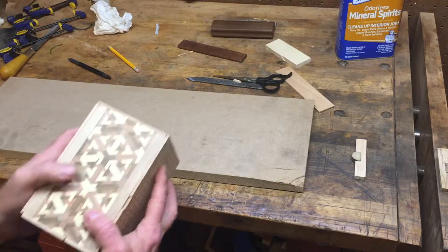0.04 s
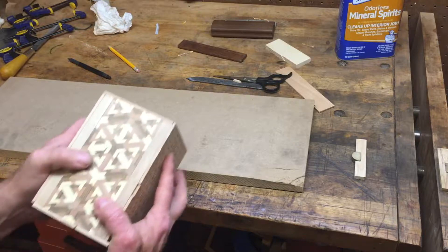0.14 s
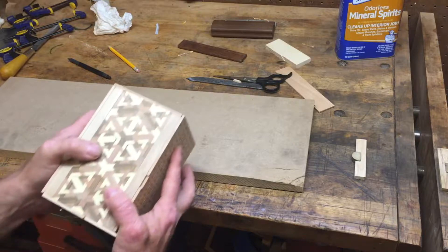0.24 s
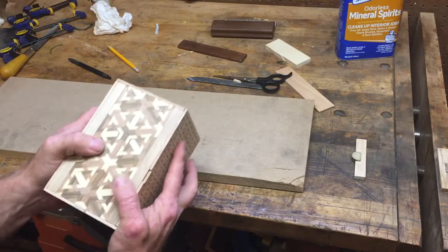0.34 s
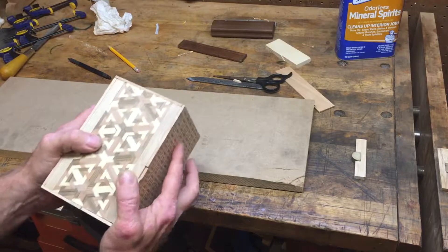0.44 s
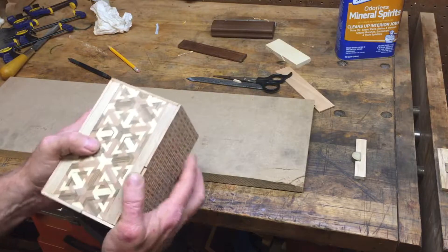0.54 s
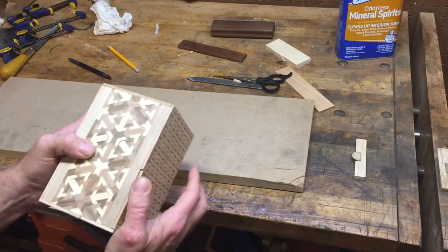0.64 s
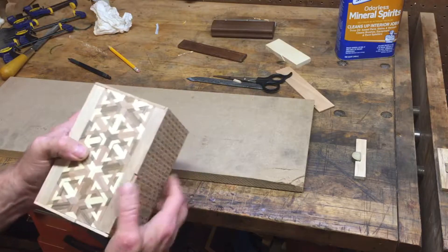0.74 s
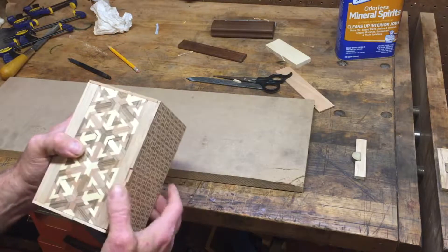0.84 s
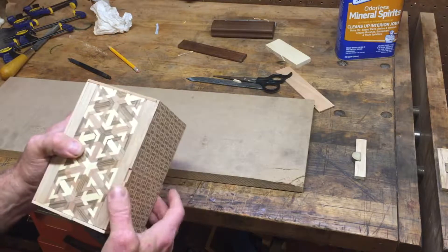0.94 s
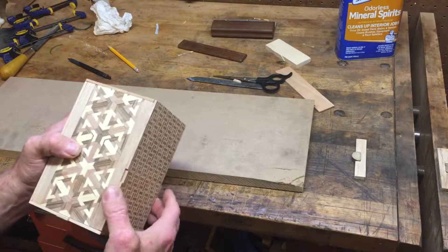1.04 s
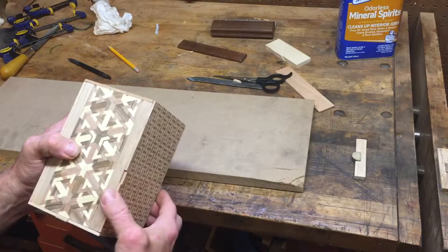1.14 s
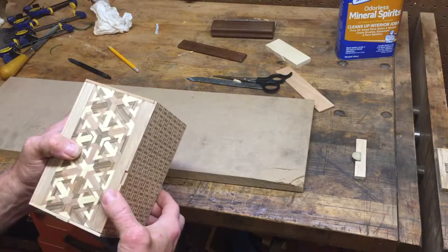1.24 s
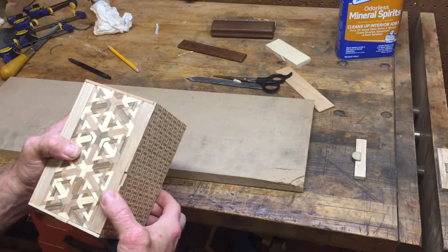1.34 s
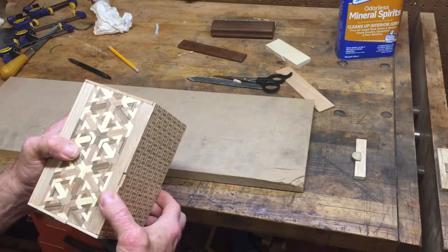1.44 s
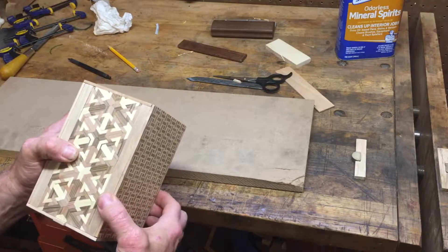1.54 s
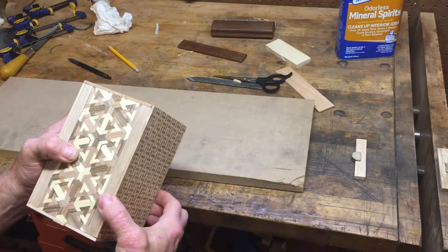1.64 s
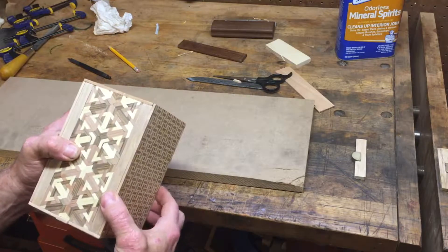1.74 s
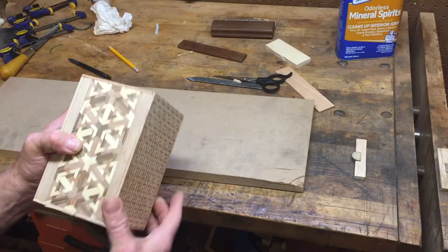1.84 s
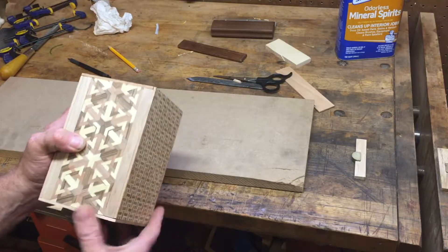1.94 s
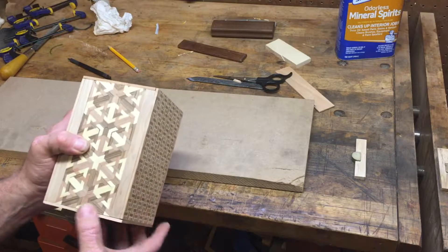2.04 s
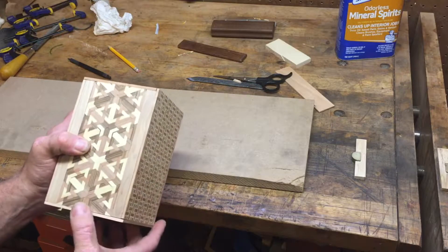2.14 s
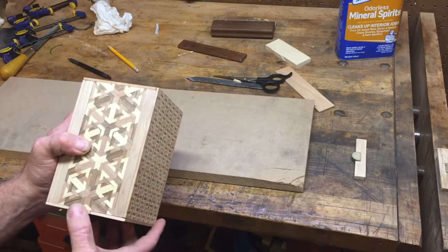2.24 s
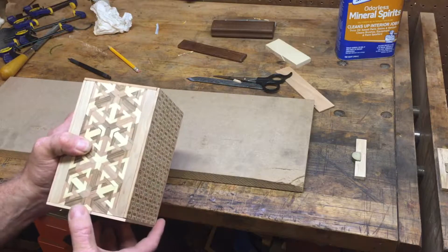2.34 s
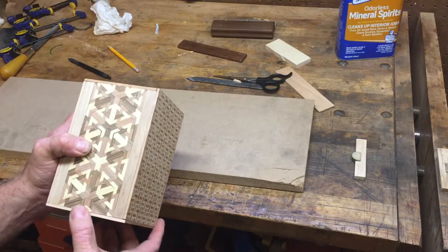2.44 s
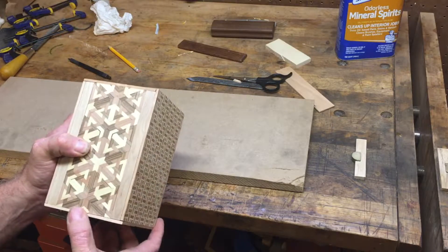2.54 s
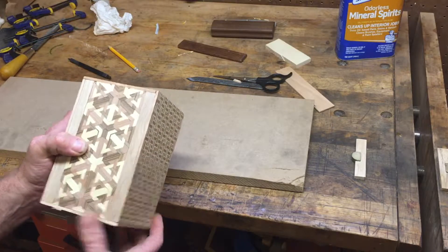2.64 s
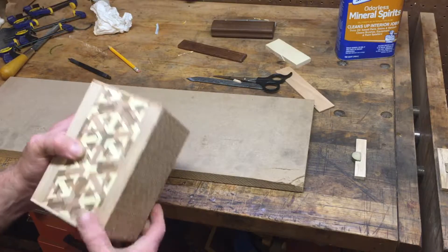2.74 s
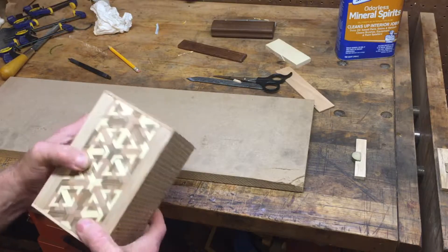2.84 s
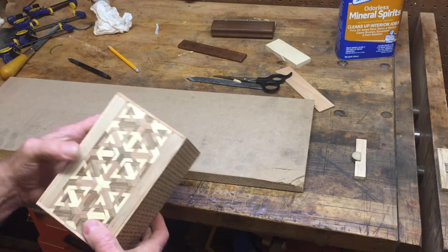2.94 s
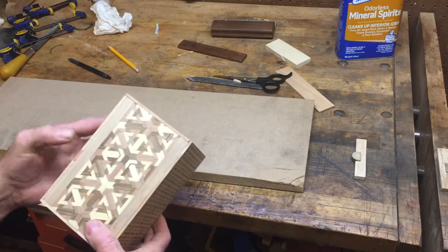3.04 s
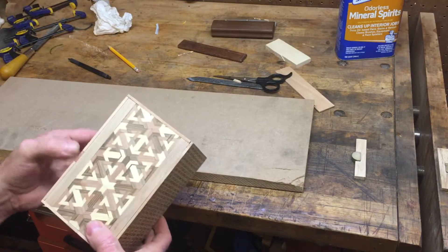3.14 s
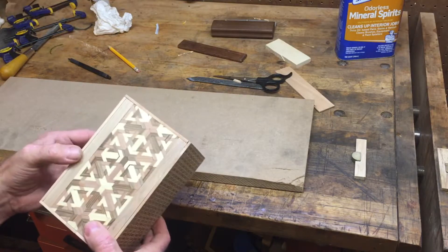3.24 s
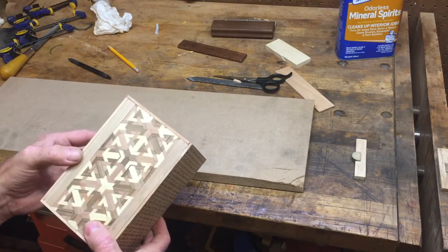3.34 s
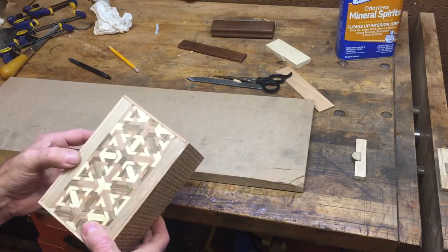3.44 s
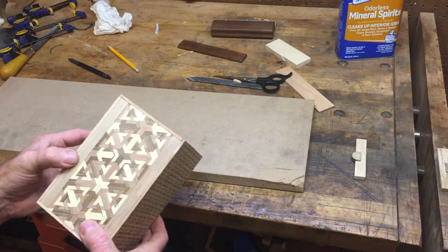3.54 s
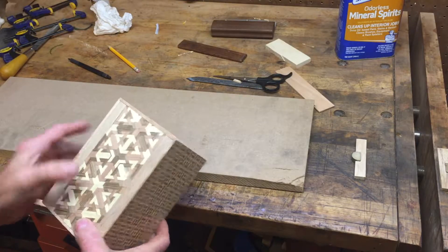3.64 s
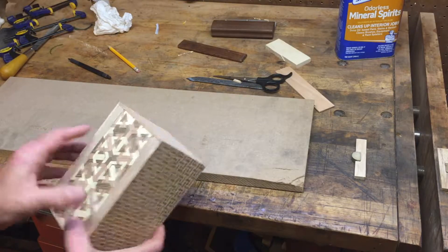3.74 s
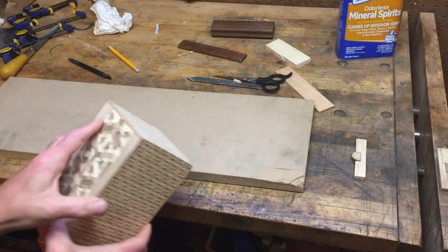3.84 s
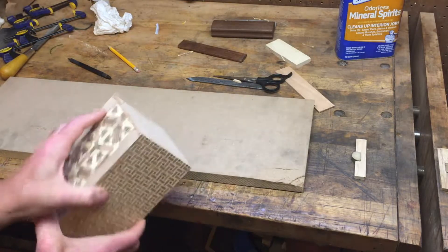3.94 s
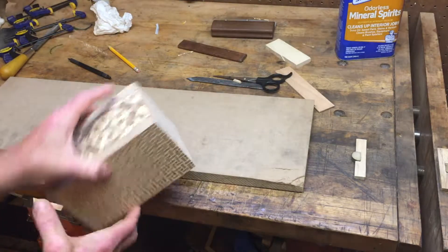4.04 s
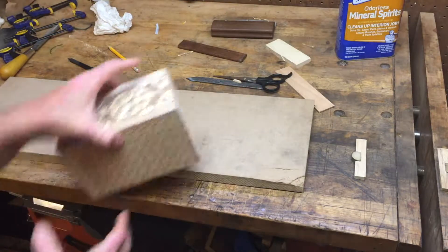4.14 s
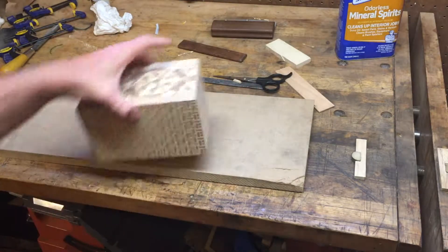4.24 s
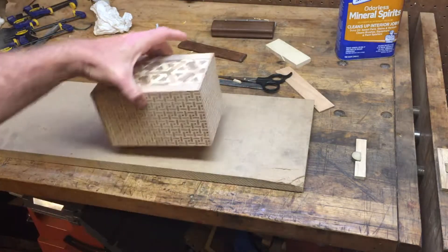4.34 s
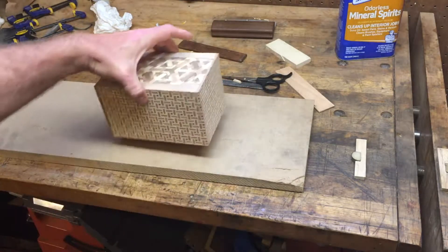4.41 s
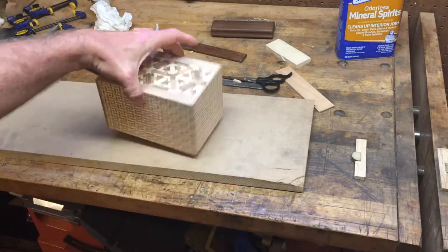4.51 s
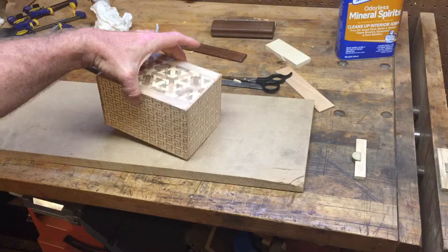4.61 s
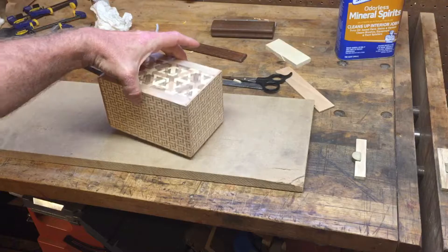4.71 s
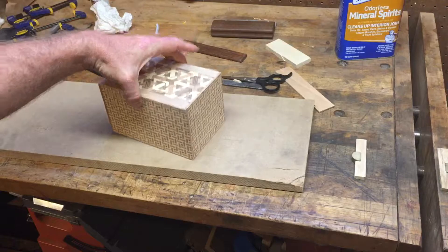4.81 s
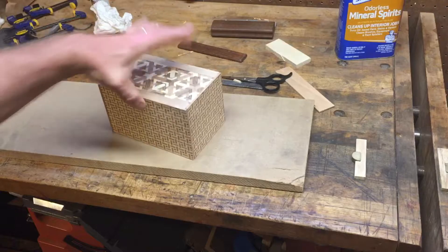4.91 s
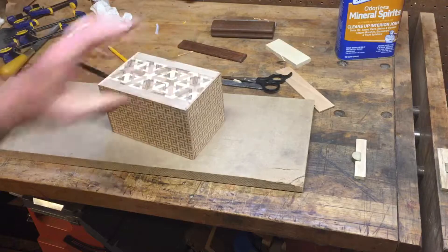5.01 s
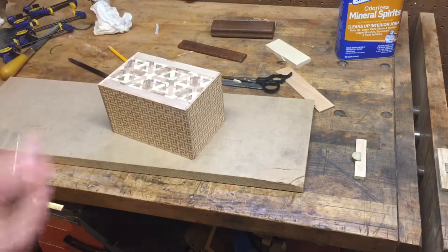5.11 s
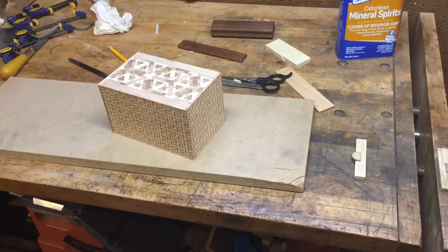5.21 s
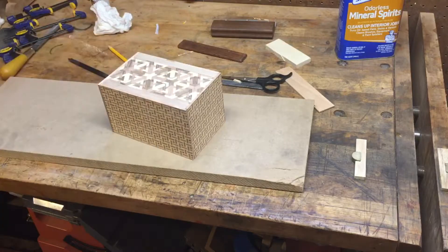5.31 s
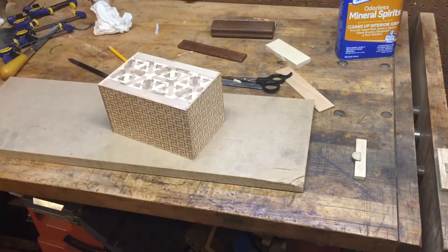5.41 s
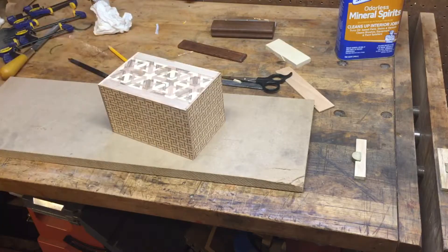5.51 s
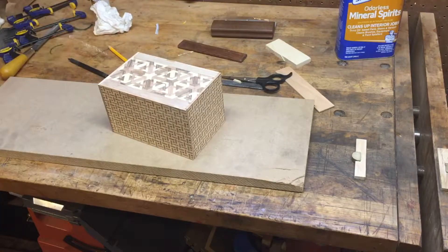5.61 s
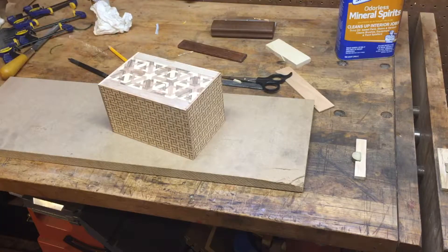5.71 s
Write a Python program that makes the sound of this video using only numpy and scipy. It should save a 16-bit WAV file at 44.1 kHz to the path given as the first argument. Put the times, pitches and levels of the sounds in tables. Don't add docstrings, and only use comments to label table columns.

```python
import sys
import numpy as np
from scipy import signal
from scipy.fft import rfft, irfft, next_fast_len
from scipy.io import wavfile
from scipy.ndimage import uniform_filter1d, map_coordinates

SR = 44100
rng = np.random.default_rng(int(sys.argv[2]) if len(sys.argv) > 2 else 0)


def unload_audio(sound):
    columns = np.transpose(np.atleast_2d(sound))
    steps = np.round(np.clip(columns, -1, 1) * 32767)
    wavfile.write(sys.argv[1], SR, steps.astype(np.int16))


def nominal_scale(level):
    x = np.asarray(level, float) / 20
    return 10 ** x


N = 254456
T = np.arange(N) / SR
WALL_DELAY = 130

# centre_hz, width_hz, level_db
PANEL_MODES = [(1080, 210, -7.5), (1304, 110, -1), (1460, 157, -1), (1740, 264, 1), (2150, 220, -14)]
# freq_hz, density_db (per Hz)
GRAIN_SPECTRUM = [(1060, -15), (1800, -9.5), (2500, -4.5), (3170, -4), (3800, -4.5), (4800, -11),
                  (5500, -27), (7150, -38), (12100, -120)]
# freq_hz, t60_s
SHOP_DECAY = [(200, 0.38), (1000, 0.17), (2500, 0.2), (5000, 0.15), (15000, 0.19)]
# centre_hz, width_hz, level_db
LIGHT_MODES = [(920, 110, 3), (1610, 370, 3.5), (2530, 570, -9), (3800, 580, 6.5)]


def unit(x):
    return x / np.sqrt(np.mean(x ** 2) + 1e-20)


def along(points, hz):
    f, v = np.transpose(points)
    return np.interp(np.log(hz + 1), np.log(f + 1), v)


def wobble(rate):
    knots = rng.standard_normal(int(N * rate / SR) + 4)
    return map_coordinates(knots, [T * rate])


def filtered(x, response):
    m = next_fast_len(len(x) + 8192)
    return irfft(rfft(x, m) * response(np.fft.rfftfreq(m, 1 / SR)), m)[:len(x)]


def coloured(x, spectrum):
    return unit(filtered(x, lambda hz: nominal_scale(along(spectrum, hz))))


def resonant(x, peaks):
    def body(f):
        total = 0
        for k, (centre, width, db) in enumerate(peaks):
            damping = 1j * f * width
            total = total + (-1) ** k * nominal_scale(db) * damping / (centre * centre - f * f + damping)
        return total
    return unit(filtered(x, body))


def dying(decays):
    hz, t, z = signal.stft(rng.standard_normal(SR // 2), SR, nperseg=128)
    t60 = along(decays, hz)[:, None]
    tail = signal.istft(z * nominal_scale(-60 * t / t60), SR, nperseg=128)[1]
    return tail / np.linalg.norm(tail)


def shop(x):
    return signal.fftconvolve(np.pad(x, (WALL_DELAY, 0)), dying(SHOP_DECAY))[:len(x)]


def contact_gains(rows, fibre_db, lean, point):
    edge_db = -20
    out = np.zeros((3, N))
    for s, db, rise, fall, bright in rows:
        part = slice(max(round((s - 3 * rise) * SR), 0), round((s + 3 * fall) * SR))
        t = T[part]
        away = np.where(t < s, (s - t) / rise, (t - s) / fall)
        balance_db = np.array([[-bright / 2], [fibre_db + lean * bright], [bright / 2]])
        out[:, part] += nominal_scale(db + balance_db + edge_db * away ** point)
    return out


def friction(grain_db, clump_db, patchy_db):
    catches = rng.standard_normal(N) * nominal_scale(grain_db * wobble(1500) + clump_db * wobble(110))
    z = signal.stft(catches, nperseg=256)[2]
    field = uniform_filter1d(rng.standard_normal(z.shape), size=3, axis=0)
    field = uniform_filter1d(field, size=14, axis=1)
    return signal.istft(z * nominal_scale(patchy_db * unit(field)), nperseg=256)[1][:N]


def rubbing(rows, peaks, grain, fibre_db, lean, point, grain_db, clump_db, patchy_db):
    # freq_hz, density_db (per Hz)
    skin_spectrum = [(2600, -18), (4500, -2.5), (6100, 4), (7200, -1.5), (9400, -1), (10400, -7.5),
                     (11500, -1.5), (13500, -7), (15650, -8), (15950, -80)]
    ring, fibre, hiss = contact_gains(rows, fibre_db, lean, point)
    slip = friction(grain_db, clump_db, patchy_db)
    wood = ring * resonant(slip, peaks) + fibre * coloured(slip, grain)
    fine_slip = friction(0.29 * grain_db, 0.47 * clump_db, patchy_db)
    return wood + hiss * coloured(fine_slip, skin_spectrum)


def struck(peaks, decays, dense_db, wet_db, contact):
    blow = nominal_scale(dense_db) * dying(decays)[:SR // 2]
    blow[0] += 1
    blow[WALL_DELAY:] += nominal_scale(wet_db) * dying(SHOP_DECAY)[:SR // 2 - WALL_DELAY]
    spectrum = rfft(blow, SR)
    band_power = uniform_filter1d(np.abs(spectrum) ** 2, size=120)
    even = irfft(spectrum / np.sqrt(band_power), SR)
    push = np.exp(-.5 * ((T[:100] - 3 * contact) / contact) ** 2)
    ring = resonant(np.convolve(even[:SR // 2], push)[:SR // 2], peaks)
    return ring / np.abs(ring).max()


def knock(blows, peaks, dense_db, wet_db, snap, contact):
    # centre_hz, width_hz, level_db
    bench_modes = [(140, 41, -13.5), (208.4, 15, -2.5), (221, 8, -17.5), (233, 14, 1.5), (265.5, 39, -2.5),
                   (310, 43, -1.5), (370, 65, -2.5), (396, 55, -5.5)]
    # freq_hz, t60_s
    bench_decay = [(100, 0.28), (400, 0.065)]
    # freq_hz, t60_s
    wood_decay = [(300, 0.2), (1000, 0.071), (2500, 0.058), (6000, 0.023)]
    # freq_hz, density_db (per Hz)
    crack_spectrum = [(800, -10), (2000, 5.5), (4000, 1.5), (8000, -3.5), (12000, -12.5), (15500, -14.5),
                      (16500, -32)]
    out, t = np.zeros(N + SR), T[:SR // 2]
    for s, db, crack_db, thud_db in blows:
        crack = coloured(rng.standard_normal(len(t)), crack_spectrum) * nominal_scale(crack_db - 60 * t / snap)
        thud = nominal_scale(thud_db) * struck(bench_modes, bench_decay, -8, wet_db - 5, contact=0.00034)
        ring = nominal_scale(db) * struck(peaks, wood_decay, dense_db, wet_db, contact)
        out[round(s * SR):][:len(t)] += ring + thud + crack + nominal_scale(wet_db) * shop(crack)
    return out[:N]


def ringing(modes, t, attack):
    ring = 0
    for hz, db, t60 in modes:
        strength, phase = rng.random(2)
        decay = nominal_scale(db + 3.2 * strength - 60 * t / t60)
        ring = ring + decay * np.sin(2 * np.pi * (hz * t + phase))
    return ring * (1 - np.exp(-t / attack))


def finger_strokes():
    # firmest_s, level_db, rise_s, fall_s, brightness_db (hiss over ring)
    strokes = [(0.0, -64, .01, 0.053, -11), (.12, -74, 0.14, 0.066, -5.5), (.335, -73.5, 0.03, 0.0078, -8),
               (.59, -68.5, 0.057, 0.075, -4), (.755, -71.5, 0.032, 0.14, 0),
               (.88, -80.5, 0.071, 0.034, -5), (1.19, -80, 0.14, .06, 2), (1.785, -72, .04, 0.0093, 2),
               (1.976, -68.5, 0.059, 0.057, 5.5), (2.216, -82, 0.14, .02, -8),
               (2.588, -78, 0.017, 0.027, -7), (2.672, -79, 0.03, 0.023, -1),
               (2.926, -77.5, 0.039, 0.11, 2), (3.855, -85, .045, .05, 21), (3.995, -63, 0.049, 0.042, 5),
               (4.053, -76.5, 0.021, 0.035, 23), (4.083, -69.5, 0.039, 0.01, -4),
               (4.216, -78, .03, 0.086, -1), (4.288, -79, 0.061, .03, 13)]
    return rubbing(strokes, PANEL_MODES, GRAIN_SPECTRUM, fibre_db=-1.5, lean=0.05, point=1.56,
                   grain_db=1.0, clump_db=1.9, patchy_db=3.0)


def motor_hum():
    hum_pitches = [55.75, 58.69, 100.83, 102.95, 111.47, 117.39, 119.99, 234.8]
    # level_db (rms), drift_rad
    hum_levels = [(-69.6, .08), (-71.3, .08), (-75, .3), (-79.5, .4), (-79.8, .15), (-67, .08),
                  (-70.9, .03), (-89, .2)]
    in_step_s = 2.03
    hum = np.zeros(N)
    for hz, (db, drift) in zip(hum_pitches, hum_levels):
        phase = 2 * np.pi * hz * (T - in_step_s) + drift * wobble(1.5)
        hum += np.sqrt(2) * nominal_scale(db) * np.cos(phase)
    return hum


def room_air():
    # freq_hz, density_db (per Hz)
    rumble_spectrum = [(20, -53.5), (30, -22), (42, -1.5), (90, 3), (105, 3.5), (165, 0), (185, -3),
                       (230, -2.5), (270, -16), (400, -19), (600, -38), (2000, -120)]
    # freq_hz, density_db (per Hz)
    air_spectrum = [(150, -24), (250, -3.5), (313, 2), (468, -8.5), (662, -6.5), (761, -9.5), (2400, -12.5),
                    (2860, -13.5), (4340, -15.5), (4900, -19), (5730, -17), (9490, -21.5), (10400, -22.5),
                    (15650, -23.5), (15950, -93)]
    # peak_s, rise_db (over its rest)
    rumble_swells = [
        (.5, 4),
        (1.0, 3.5),
        (1.86, 2),
        (2.33, 1),
        (3.65, 2.5),
        (4.44, 2),
        (4.879, 12),
        (5.28, 9),
    ]
    rest_db, swell_s = -69, 0.076
    swell_db = sum(db * np.exp(-np.abs(T - s) / swell_s) for s, db in rumble_swells)
    rumble = nominal_scale(rest_db + swell_db) * coloured(rng.standard_normal(N), rumble_spectrum)
    hiss = nominal_scale(-72.5 + 0.268 * wobble(5.07)) * coloured(rng.standard_normal(N), air_spectrum)
    return rumble + hiss


def panel_click():
    # start_s, ring_db (peak), crack_db, thud_db
    click_blow = [
        (.3427, -26.5, -36, -51),
    ]
    rebound_blow = [
        (.3762, -26.5, -58, -78),
    ]
    # centre_hz, width_hz, level_db
    held_modes = [(340, 37, -8), (865, 46, 2.5), (1170, 130, 2), (1510, 440, -0.5), (1800, 220, 3.5),
                  (2530, 860, -9.5), (3390, 1300, -6), (4480, 510, -8), (5550, 330, -6)]
    loose_modes = [(323, 54, -4.5), (550, 45, -3.5), (690, 220, -8), (1145, 240, 3.5), (1570, 220, 3),
                   (2230, 400, -5)]
    click = knock(click_blow, held_modes, dense_db=-4.5, wet_db=-2.5, snap=0.024, contact=.000015)
    rebound = knock(rebound_blow, loose_modes, dense_db=-6.5, wet_db=-10.5, snap=.013, contact=.00008)
    return click + rebound


def soft_bumps():
    # start_s, level_db, pitch_hz, t60_s
    pushes = [
        (1.271, -52, 161, 0.14),
        (1.866, -53, 168, 0.15),
        (2.452, -53, 161, 0.08),
        (2.854, -52, 205, 0.12),
        (4.612, -49, 74.5, 0.4),
        (4.852, -49.5, 69.6, 0.28),
        (4.84, -42, 104, 0.18),
        (5.598, -37, 213.4, 0.11),
    ]
    out, t = np.zeros(N + SR), T[:SR // 2]
    for s, db, hz, t60 in pushes:
        modes = [(hz, db, t60), (0.65 * hz, db - 8.5, 0.72 * t60)]
        out[round(s * SR):][:len(t)] += ringing(modes, t, attack=.008)
    return out[:N]


def panel_slips():
    # firmest_s, level_db, rise_s, fall_s, brightness_db
    slips = [
        (1.566, -53.5, 0.017, .015, -4.5),
        (1.804, -54, 0.014, 0.012, -2.5),
        (2.405, -65.5, 0.0084, 0.045, -5.5),
        (2.786, -56, 0.044, 0.086, -9.5),
        (2.844, -67.5, 0.013, 0.024, -16),
        (3.586, -69, 0.019, 0.022, 4),
        (3.613, -78, 0.018, 0.025, -16),
    ]
    return rubbing(slips, PANEL_MODES, GRAIN_SPECTRUM, fibre_db=-1.3, lean=0.18, point=1.04,
                   grain_db=3.5, clump_db=2.0, patchy_db=2.0)


def nail_ticks():
    # start_s, ring_db (peak), crack_db, thud_db
    ticks = [
        (2.215, -62, -80, -83),
        (2.402, -53.5, -77, -78),
        (2.583, -68, -78, -78),
        (2.677, -64, -65, -80),
    ]
    return knock(ticks, LIGHT_MODES, dense_db=-1, wet_db=-5.0, snap=0.011, contact=.00002)


def corner_slides():
    # firmest_s, level_db, rise_s, fall_s, brightness_db
    slides = [
        (4.595, -72, 0.036, 0.012, -10),
        (4.721, -73.5, 0.0054, 0.05, -35.5),
        (4.824, -72, 0.027, 0.018, -8),
        (5.274, -56, 0.0057, 0.026, 4.5),
        (5.31, -73.5, 0.084, 0.097, -3),
        (5.6, -57, .004, 0.073, -21),
        (5.657, -66.5, .004, 0.066, 1.5),
        (5.698, -62.5, 0.058, 0.057, 12.5),
    ]
    # centre_hz, width_hz, level_db
    hollow_modes = [(230, 18, -1), (454, 130, -0.5), (666, 165, 0), (1070, 89, -0.5), (1400, 360, -8)]
    # freq_hz, density_db (per Hz)
    fibre_spectrum = [(760, -40), (1300, -9.5), (1540, -1.5), (1790, 1), (3460, -1.5), (3780, -4),
                      (4400, -8), (5500, -10.5), (7150, -44), (12100, -120)]
    return rubbing(slides, hollow_modes, fibre_spectrum, fibre_db=7.5, lean=0.26, point=1.12,
                   grain_db=2.5, clump_db=-0.6, patchy_db=1.5)


def box_landing():
    # start_s, ring_db (peak), crack_db, thud_db
    corner_blows = [
        (4.6076, -22, -36, -34.5),
        (4.7185, -69, -80, -54.5),
    ]
    flat_blow = [
        (4.8346, -15.5, -35.5, -25.5),
    ]
    # centre_hz, width_hz, level_db
    tilted_modes = [(513, 69, -9.5), (730, 200, -13.5), (903, 190, -7), (1135, 120, 6.5), (1443, 510, -1),
                    (1822, 300, -2), (2157, 330, -9), (2765, 430, -15), (4000, 300, -18.5)]
    resting_modes = [(566, 130, -3), (662, 110, -1), (826, 113, 1.5), (947, 256, 2), (1180, 315, 2.5),
                     (1310, 183, 2), (1550, 140, -4), (1708, 180, -3.5), (2016, 316, -1), (2260, 350, -1),
                     (2850, 450, -13.5), (3300, 320, -22.5), (3800, 430, -20.5)]
    corner = knock(corner_blows, tilted_modes, dense_db=4.5, wet_db=-4.0, snap=0.017, contact=.00003)
    flat = knock(flat_blow, resting_modes, dense_db=-5, wet_db=-4.5, snap=0.02, contact=.00003)
    return corner + flat


def bench_taps():
    # start_s, ring_db (peak), crack_db, thud_db
    tap_blows = [
        (5.272, -32.5, -50, -61),
        (5.3519, -39.5, -60, -61.5),
        (5.4188, -44.5, -58, -61),
        (5.593, -29.5, -54.5, -45),
    ]
    # centre_hz, width_hz, level_db
    nudged_modes = [(570, 200, -5.5), (1020, 200, 2.5), (1360, 330, -2), (1780, 105, 0.5),
                    (2230, 490, -7.5), (2870, 600, -10.5), (6600, 2800, -17.5)]
    parts = knock(tap_blows[:3], LIGHT_MODES, dense_db=-1, wet_db=-5.0, snap=0.011, contact=.00002)
    nudge = knock(tap_blows[3:], nudged_modes, dense_db=1.5, wet_db=5.0, snap=0.042, contact=.000045)
    return parts + nudge


def bench_scrapes():
    # firmest_s, level_db, rise_s, fall_s, brightness_db
    scrapes = [
        (5.353, -51.5, 0.0051, 0.037, 0),
        (5.366, -57.5, 0.019, 0.099, -18.5),
        (5.417, -61, .03, 0.034, -12),
    ]
    # centre_hz, width_hz, level_db
    board_modes = [(226, 6, -3.5), (620, 6.6, 8), (1116, 52, -4), (1390, 68, -12)]
    # freq_hz, density_db (per Hz)
    rasp_spectrum = [(760, -21.5), (1300, -9.5), (2000, -12), (2450, -5.5), (2800, -12), (3180, -11),
                     (4930, -31.5), (5500, -47), (7150, -53), (12100, -120)]
    return rubbing(scrapes, board_modes, rasp_spectrum, fibre_db=9.5, lean=0.17, point=1.25,
                   grain_db=1.0, clump_db=0.5, patchy_db=5.5)


def scene():
    rubbed = finger_strokes() + panel_slips() + corner_slides() + bench_scrapes()
    rubbed = rubbed + nominal_scale(-11.5) * shop(rubbed)
    knocked = panel_click() + nail_ticks() + box_landing() + bench_taps()
    machines = motor_hum() + room_air()
    return (rubbed + knocked + soft_bumps() + machines)[None]


def top_cut(x):
    return signal.sosfilt(signal.butter(12, 16590, fs=SR, output="sos"), x)


def record(dry):
    mix = filtered(dry[0], lambda hz: hz < 16500)[None]
    return top_cut(mix)


dry = scene()
out = record(dry)
unload_audio(out)
```